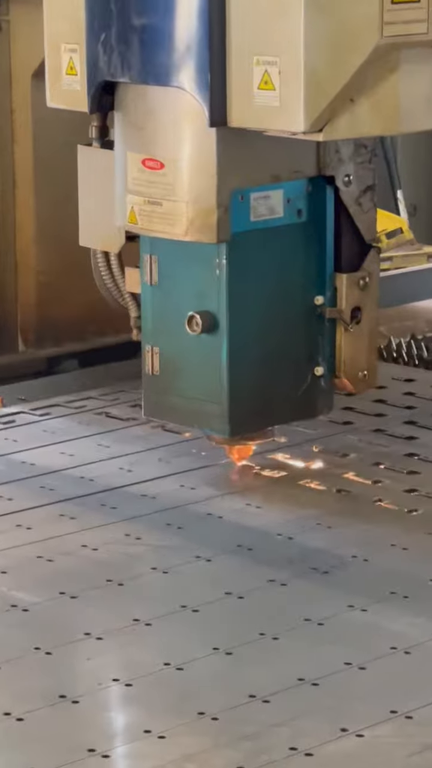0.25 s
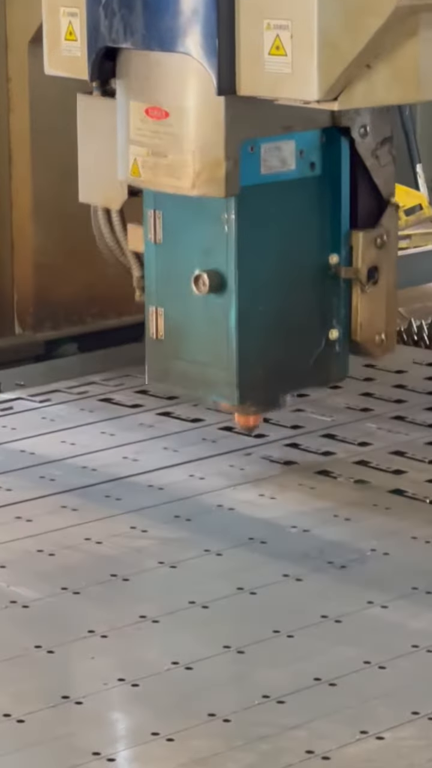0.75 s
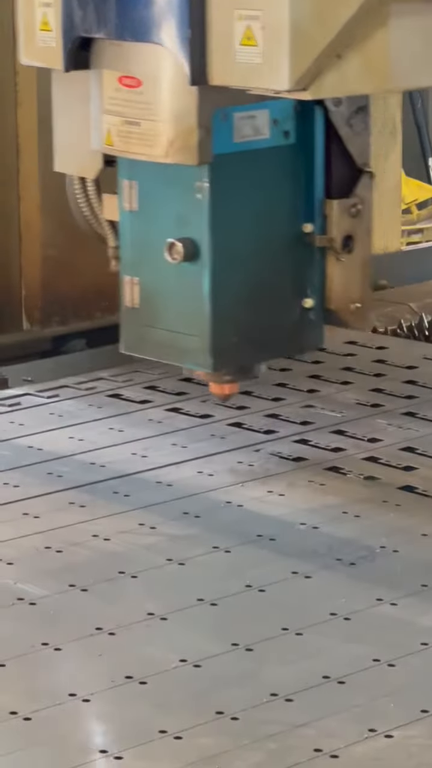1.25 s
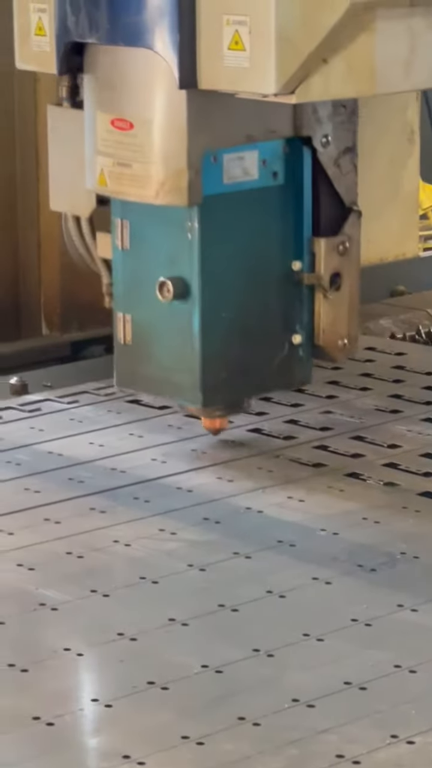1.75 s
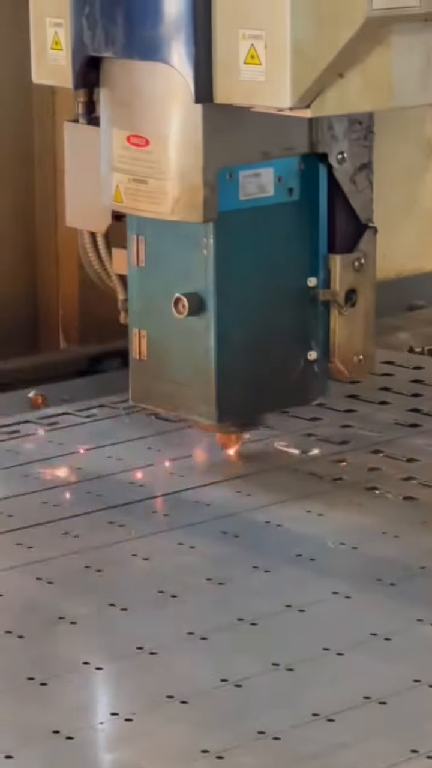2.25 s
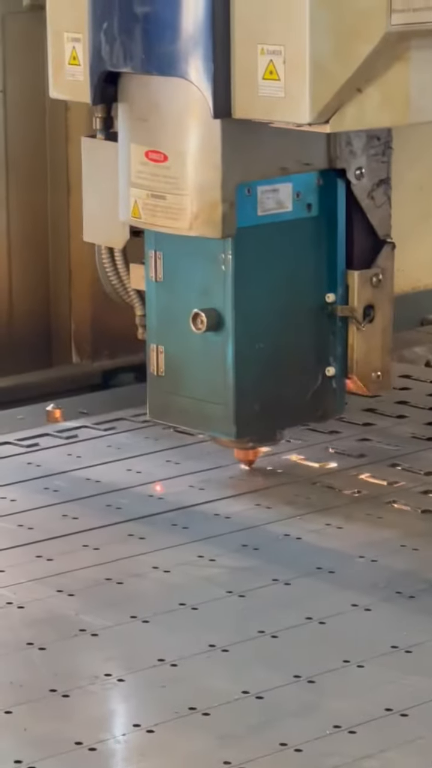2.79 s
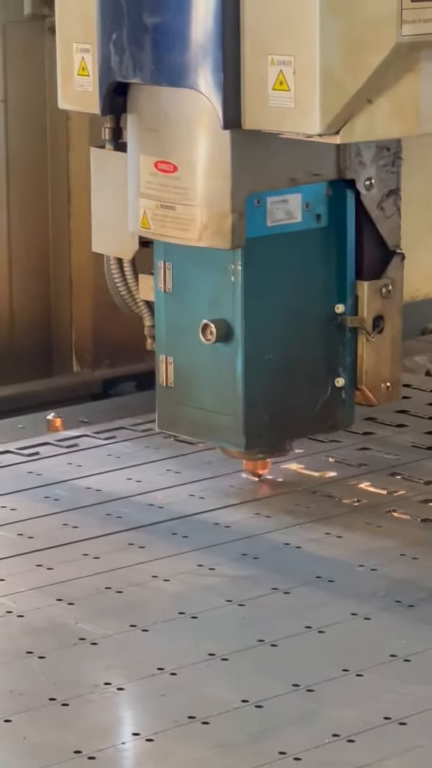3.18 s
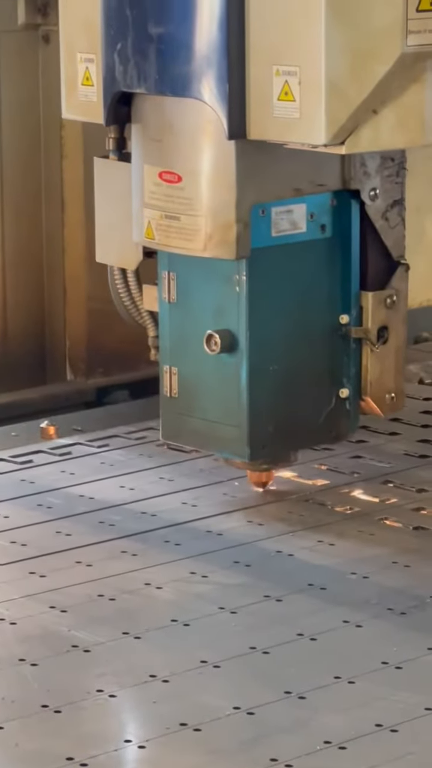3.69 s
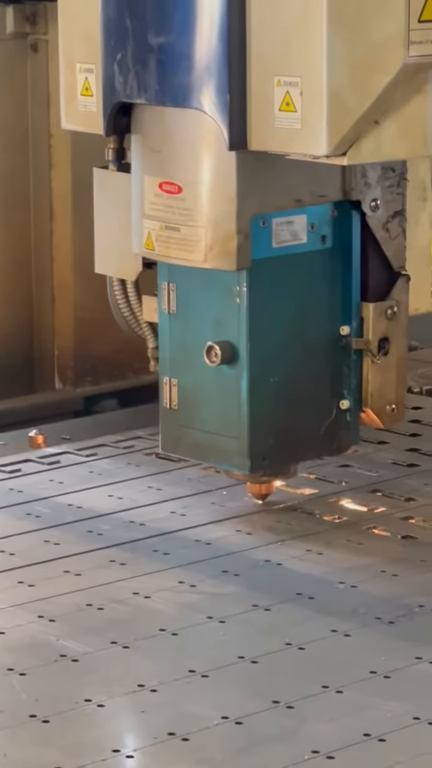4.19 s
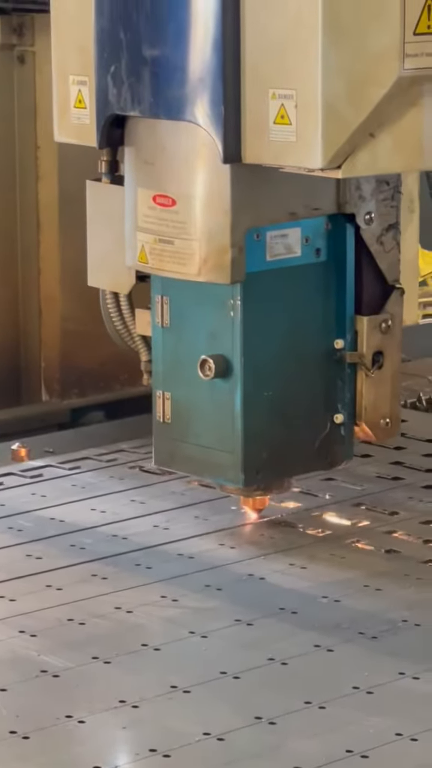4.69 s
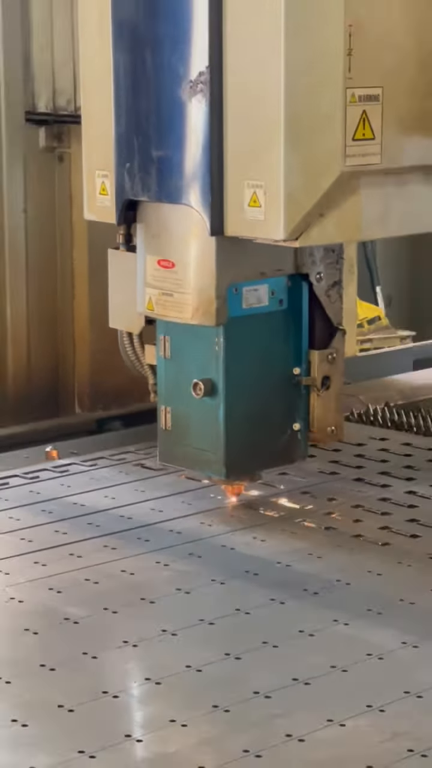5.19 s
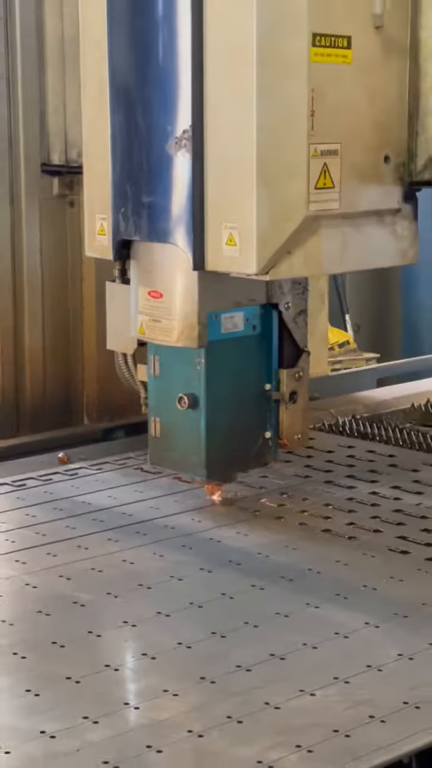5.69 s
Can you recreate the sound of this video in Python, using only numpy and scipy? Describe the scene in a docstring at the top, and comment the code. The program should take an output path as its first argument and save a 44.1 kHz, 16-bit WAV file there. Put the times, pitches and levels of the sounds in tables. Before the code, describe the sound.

Close stereo pickup of a laser cutting head in a factory hall. Broad fan roar and a wavering low hum run throughout. Thin gas hiss cuts out before one second, returns at two with sputtering crackles, then continues with faint whistles. At 3.6 seconds a loud bright air blast bursts, briefly ducking everything and ringing away in the hall.

```python
"""Fan roar, motor hum and hissing gas come first: a laser cutter at work in a factory hall.
Shaped noise makes the roar and the two-layer hiss of assist gas; wavering tones make hum and whistles.
Molten metal spits in short crackling puffs, then one air valve blast rings on through the hall.
Two close microphone ports hear it; a gain control ducks everything after bright peaks like the blast."""
import sys
import numpy as np
from scipy import signal
from scipy.fft import rfft, irfft
from scipy.io import wavfile
from scipy.ndimage import uniform_filter1d, minimum_filter1d

SR = 44100
rng = np.random.default_rng(int(sys.argv[2]) if len(sys.argv) > 2 else 0)


def convert_level_to_amplitude(level_db):
    """Map a level in decibels to its linear amplitude factor."""
    exponent = np.asarray(level_db, float) / 20
    return 10 ** exponent


def transcribe(u):
    """Save the signal u as a 16-bit wav file named by the first command-line argument.

    u: samples, shape (n,) or (channels, n), limited to [-1, 1]; the rate is SR.
    q: integer samples, one column per channel.
    """
    v = np.clip(np.atleast_2d(u).T, -1, 1)
    q = np.round(v * 32767).astype(np.int16)
    wavfile.write(sys.argv[1], SR, q)


N = 261954


def read(table, hz, column=1):
    """A column of a spectrum table, straight on a log-frequency axis."""
    table = np.transpose(table)
    return np.interp(np.log(hz + 1), np.log(table[0] + 1), table[column])


def evened(x):
    """Scales to rms 1."""
    return x / np.sqrt(np.mean(x ** 2) + 1e-20)


def curve(rows):
    """Columns of a time table, interpolated at every sample."""
    s, *columns = np.transpose(rows)
    return [np.interp(np.arange(N) / SR, s, column) for column in columns]


def stft_grid(size, length):
    """Frequencies in Hz (column) and times in s (row) of short-time spectra."""
    hz = np.fft.rfftfreq(size, 1 / SR)[:, None]
    t = np.arange(4 * length // size + 5) * size / 4 / SR
    return hz, t


# Stereo likeness and balance by pitch: pitch_hz [Hz], left_right_likeness [0-1], left_over_right_db [dB]
STEREO_IMAGE = [(100, 1, 0), (140, .997, 1), (200, .99, 1), (400, .92, 2), (600, .77, 3.4),
                (1100, .64, 2.5), (1700, .66, 2), (2100, .985, 0), (4000, .98, 0), (4900, .75, 0),
                (5200, .99, 0), (6200, .99, 0), (6800, .8, 0), (8200, .8, 0), (8900, .99, 0),
                (11600, .99, 0), (12000, .75, 0), (13300, .78, 0), (14000, .985, 0)]


def hiss(field_db, length, patchy_db):
    """Noise pair from a dB field over frequency and time, with drifting patches and stereo by pitch."""
    bins, frames = field_db.shape
    hz = np.linspace(0, SR / 2, bins)[:, None]
    a, b, c, d, patches = rng.standard_normal((frames, bins, 5)).T
    patches = uniform_filter1d(patches, size=8, axis=0)
    patches = evened(uniform_filter1d(patches, size=10, axis=1))
    likeness = np.clip(read(STEREO_IMAGE, hz), 0, 1)
    lean_db = read(STEREO_IMAGE, hz, column=2) / 2  # half the difference for each port
    left = a + 1j * b
    right = likeness * left + np.sqrt(1 - likeness ** 2) * (c + 1j * d)
    spectra = np.array([left * convert_level_to_amplitude(lean_db), right * convert_level_to_amplitude(-lean_db)])
    spectra *= convert_level_to_amplitude(field_db + patchy_db * patches)
    pair = signal.istft(spectra, nperseg=2 * bins - 2, noverlap=3 * (bins - 1) // 2)[1]
    return pair[:, :length]


def wavering_tone(hz, pole_width_hz, steady):
    """Rms-1 tone: a steady phasor (in units of the wander's rms) plus noise through two equal poles."""
    r = np.exp(-np.pi * pole_width_hz / SR)
    noise = rng.standard_normal((N, 2)) @ [1, 1j]
    wander = signal.lfilter([1], [1, -2 * r, r * r], noise)
    wander /= np.sqrt(np.mean(abs(wander) ** 2))
    carrier = np.exp(2j * np.pi * np.cumsum(hz * np.ones(N)) / SR)
    return evened(((steady + wander) * carrier).real)


# Ventilation roar of the hall, spectrum shape: pitch_hz [Hz], relative_level_db [dB per Hz]
ROAR_SPECTRUM = [(25, -26), (45, -7.5), (75, -5.5), (95, -5), (140, -4), (220, -7.5), (330, -7.5),
                 (500, -12.5), (1050, -15), (1450, -20), (2000, -21), (3300, -27.5), (5000, -34),
                 (8000, -37.5), (12000, -46), (16000, -51)]


def roar():
    """Broad noise of fans and ducts across the hall that gusts a little."""
    hz, t = stft_grid(size=4096, length=N)
    gust_db = 0.57 * evened(uniform_filter1d(rng.standard_normal(len(t)), size=5))
    return convert_level_to_amplitude(-21) * evened(hiss(read(ROAR_SPECTRUM, hz) + gust_db, N, patchy_db=.5))


# Extractor's blade tone: time_s [s], level_db [dB rms]
BLADE_LEVEL = [(0, -34), (.25, -24), (.5, -28), (.95, -25), (1.04, -19.5), (1.9, -20.5), (2.35, -23),
               (2.55, -20.5), (2.75, -23), (3.25, -19.5), (3.6, -21.5), (4.1, -29.5), (4.7, -29),
               (5.2, -26), (5.94, -33.5)]
# Second fan tone that drifts, comes and goes: time_s [s], pitch_hz [Hz], level_db [dB rms]
SECOND_FAN_TONE = [(0, 584, -40), (.4, 581.5, -35), (1.15, 580, -33), (1.7, 589, -40.5), (2.45, 586, -48),
                   (2.65, 586, -34), (3.4, 584, -31.5), (3.9, 583.5, -38.5), (4.6, 584, -45),
                   (5.1, 583, -38), (5.5, 584, -32), (5.94, 581, -35.5)]
# Overtones of the blade tone: multiple [1], level_db [dB rms at full blade level], pole_width_hz [Hz]
BLADE_OVERTONES = [(2, -36, 3.1), (3, -35, 4.7)]
# Weaker machine tones: pitch_hz [Hz], level_db [dB rms], pole_width_hz [Hz]
MACHINE_TONES = [(63.9, -36, 0.95), (91.95, -35.5, 6.9), (292.6, -39, 3.1), (958.5, -43, 1.76),
                 (1010, -48, 4.3), (1683, -49, 2), (2037, -50, 2.2), (2397, -50.5, 2.3)]


def hum():
    """Drone, blade tone and weaker tones; standing waves make them a little louder on the left."""
    t = np.arange(N) / SR
    drone_hz, blade_hz = 58.14, 171.35
    # two motors a little apart in speed beat slowly: period 3.55 s, loudest at 3.7 s
    beat = abs(1 + 0.63 * np.exp(2j * np.pi * (t - 3.7) / 3.55))
    drone_gain = convert_level_to_amplitude(-31 + .8 * t) * beat  # also grows by .8 dB per s
    fan_hz, fan_db = curve(SECOND_FAN_TONE)
    blade_db = curve(BLADE_LEVEL)[0]
    tones = [(drone_hz, drone_gain * wavering_tone(drone_hz, 3, steady=8.0)),
             (blade_hz, convert_level_to_amplitude(blade_db) * wavering_tone(blade_hz, 8.1, steady=3.8)),
             (fan_hz.mean(), convert_level_to_amplitude(fan_db) * wavering_tone(fan_hz, 6, steady=1.75))]
    follow_db = 0.35 * (blade_db - blade_db.max())  # overtones share part of the level changes
    for multiple, level_db, width_hz in BLADE_OVERTONES:
        hz = multiple * blade_hz
        tones.append((hz, convert_level_to_amplitude(level_db + follow_db) * wavering_tone(hz, width_hz, steady=0.96)))
    for hz, level_db, width_hz in MACHINE_TONES:
        tones.append((hz, convert_level_to_amplitude(level_db) * wavering_tone(hz, width_hz, steady=0.64)))
    sides = np.c_[[.5, -.5]]
    return sum(tone * convert_level_to_amplitude(read(STEREO_IMAGE, hz, column=2) * sides) for hz, tone in tones)


# Thin top of the jet, spectrum shape: pitch_hz [Hz], relative_level_db [dB per Hz]
JET_TOP_SPECTRUM = [(6000, -33), (9000, 4.5), (12000, -4.5), (16000, -8)]
# Body of the jet, spectrum shape: pitch_hz [Hz], relative_level_db [dB per Hz]
JET_BODY_SPECTRUM = [(2000, -26.5), (4000, 0), (6500, 0.5), (8000, 1), (10000, 2), (12000, -5),
                     (14000, -19)]
# Assist gas flowing: start_s [s], end_s [s], top_level_db [dB rms at start], body_level_db [dB rms at start]
GAS_FLOWS = [(-.1, 0.37, -42.5, -38), (.39, 0.71, -42, -55), (.62, 0.77, -40, -38.5),
             (1.66, 1.69, -42, -49), (1.975, 2.25, -35.5, -35.5), (2.28, 6.1, -40.5, -36)]


def gas():
    """Turbulent jet in two layers, flickering together as melt is blown from the kerf."""
    t = np.arange(N) / SR
    open_s, close_s = 0.019, .06
    top_sag_db_per_s, body_sag_db_per_s = 0.1, 1.2  # a long flow slowly weakens
    top_power, body_power = convert_level_to_amplitude(-56) ** 2, convert_level_to_amplitude(-47) ** 2  # the leak between the flows
    for start, end, top_db, body_db in GAS_FLOWS:
        gate = np.clip(np.minimum((t - start) / open_s, 1 + (end - t) / close_s), 0, 1)
        top_power = top_power + (gate * convert_level_to_amplitude(top_db - top_sag_db_per_s * (t - start))) ** 2
        body_power = body_power + (gate * convert_level_to_amplitude(body_db - body_sag_db_per_s * (t - start))) ** 2
    hz, frame_s = stft_grid(size=512, length=N)
    # quick and slow flicker
    flicker_db = 1.0 * evened(uniform_filter1d(rng.standard_normal(len(frame_s)), size=6))
    flicker_db += 0.8 * evened(uniform_filter1d(rng.standard_normal(len(frame_s)), size=30))
    top = evened(hiss(read(JET_TOP_SPECTRUM, hz) + flicker_db, N, patchy_db=1.5))
    body = evened(hiss(read(JET_BODY_SPECTRUM, hz) + 0.56 * flicker_db, N, patchy_db=3.0))
    return np.sqrt(top_power) * top + np.sqrt(body_power) * body


# The jet whistles across the kerf:
# start_s [s], end_s [s], pitch_hz [Hz], pole_width_hz [Hz], level_db [dB rms before the fades]
KERF_WHISTLES = [(2.62, 2.8, 5290, 80, -46), (2.69, 3.24, 6390, 90, -47), (2.66, 3.46, 5980, 900, -41.5),
                 (3.22, 3.45, 5950, 110, -47), (4.0, 4.5, 6450, 400, -45)]


def whistles():
    """Fuzzy edge tones of the jet that fade in and out."""
    t = np.arange(N) / SR
    out = 0
    for start, end, hz, width_hz, level_db in KERF_WHISTLES:
        fade = np.clip(np.minimum(t - start, end - t) / .05, 0, 1)
        out = out + convert_level_to_amplitude(level_db) * wavering_tone(hz, width_hz, steady=0) * fade
    return out


# Spits of molten metal: start_s [s], level_db [dB rms at the start, before snap and crackle], t60_s [s]
METAL_SPITS = [(.372, -33, .07), (.468, -37, .06), (.635, -39, .25), (1.977, -33, .09), (1.996, -34, .15),
               (2.011, -29, .2), (2.072, -34, .17), (2.175, -44, .2), (2.24, -40, .08), (3.52, -37, .05)]


def spits():
    """Each spit of molten metal is a sudden bright puff made of uneven crackles."""
    out, length = np.zeros((2, N)), SR // 4
    hz, t = stft_grid(size=128, length=length)
    after = np.arange(length) / SR
    # the first instant is sharpest
    snap = np.minimum(after / .0005, 1) * (1 + 0.54 * np.exp(-after / 0.0021))
    # eight small ones scattered along the cut, from 2.3 s on
    first_s = 2.3
    small = [(first_s + when * (N / SR - first_s), -42 + 6 * size, .06)
             for when, size in rng.random((8, 2))]
    # falls 24 dB per octave below 9 kHz
    field_db = -24 * np.maximum(np.log2(9000 / (hz + 1)), 0) + 0 * t
    for start, level_db, t60 in METAL_SPITS + small:
        puff = evened(hiss(field_db, length, patchy_db=6))
        crackle = convert_level_to_amplitude(1.6 * evened(uniform_filter1d(rng.standard_normal(length), size=60)))
        spit = convert_level_to_amplitude(level_db - 60 * after / t60) * snap * crackle * puff
        at = round(start * SR)
        part = out[:, at:at + length]
        part += spit[:, :part.shape[1]]
    return out


# Air blast, spectrum shape and hall: pitch_hz [Hz], relative_level_db [dB per Hz], hall_t60_s [s]
BLAST_SPECTRUM = [(500, -22, .3), (2000, -5.5, 1), (3530, -3.5, 1.2), (4300, -5, 1.2), (5030, -3, 0.9),
                  (8000, 2.5, 0.63), (10000, 0.5, .65), (12500, -2, .5), (14500, -2, .4), (16000, -9, 0.33)]
# Peaks and notches in the blast's hiss: pitch_hz [Hz], width_hz [Hz], gain_db [dB, negative cuts]
BLAST_PEAKS = [(4150, 380, 5.5), (5340, 160, 7), (5620, 150, 6), (6640, 120, 5), (8100, 340, 4.5),
               (8395, 150, -2), (10200, 280, -16)]


def blast():
    """A valve dumps air for a moment; the hall then lets each band die at its own speed."""
    start_s, open_s, level_db = 3.592, 0.043, -14.5
    length, out = 3 * SR // 2, np.zeros((2, N))
    hz, t = stft_grid(size=512, length=length)
    peaks_db = sum(db / (1 + (2 * (hz - f) / width) ** 2) for f, width, db in BLAST_PEAKS)
    tail_db = -60 * np.maximum(t - open_s, 0) / read(BLAST_SPECTRUM, hz, column=2)
    # hiss around 4860 Hz grows by 5 dB in .05 s while the valve opens fully; far pitches shrink
    bloom_shape = np.clip(1 - 0.55 * np.log2((hz + 1) / 4860) ** 2, -1, 1)
    bloom_db = 5 * np.clip(t / .05, 0, 1) * bloom_shape
    air = hiss(read(BLAST_SPECTRUM, hz) + peaks_db + tail_db + bloom_db, length, patchy_db=1.2)
    air /= np.sqrt(np.mean(air[:, :SR // 50] ** 2))  # rms 1 over the first 20 ms
    onset = np.minimum(np.arange(length) / SR / 0.0021, 1)
    at = round(start_s * SR)
    out[:, at:at + length] = convert_level_to_amplitude(level_db) * air * onset
    return out


def scene():
    """All sources at the microphone ports."""
    return roar() + hum() + gas() + whistles() + spits() + blast()


# Phase between the ports: pitch_hz [Hz], left_lead_rad [radians]
PORT_LEAD = [(0, 0), (1500, -.15), (2000, 0), (4100, .1), (4700, 1.2), (4950, 2.4), (5100, 0), (6150, .08),
             (6450, .9), (8100, 2.4), (8800, 3.0), (11600, 3.28), (12100, 4.1), (13400, 5.3), (14100, 6.15),
             (16000, 6.28)]


def ports(dry):
    """Spectrum behind the ports: a cavity resonance, a phase lead between them and a top edge."""
    hz = np.fft.rfftfreq(N, 1 / SR)
    resonance_hz, width_hz, boost_db, edge_hz = 14760, 2300, 10, 15850
    colour = convert_level_to_amplitude(boost_db / (1 + (2 * (hz - resonance_hz) / width_hz) ** 2)) * (hz < edge_hz)
    lead = np.interp(hz, *np.transpose(PORT_LEAD))
    return rfft(dry) * colour * np.exp(1j * lead * np.c_[[.5, -.5]])


def gain_control_db(bright):
    """Duck in dB that bright peaks trigger: it holds, then part lets go at once and part creeps back."""
    level_db = 10 * np.log10(uniform_filter1d((bright ** 2).mean(0), size=1100) + 1e-12)
    over = np.clip((level_db + 21) / 2, 0, 1)  # starts at -21 dB, full 2 dB higher
    cut_db = 6.55 * over
    hold = round(.16 * SR)
    held_db = -minimum_filter1d(-cut_db, hold, origin=(hold - 1) // 2)  # highest cut of the last .16 s
    r = np.exp(-1 / (.3 * SR))
    creep_db = signal.lfilter([1 - r], [1, -r], held_db)
    smooth_db = uniform_filter1d(np.maximum(held_db, 0.66 * creep_db), size=900)
    return np.roll(smooth_db, round(0.029 * SR))  # shifted 29 ms later


def top_cut(x):
    """Nothing passes above the cut-off."""
    return signal.sosfilt(signal.butter(12, 17000, fs=SR, output="sos"), x)


def record(dry):
    """Two close microphone ports, then a gain control that listens to the treble and ducks everything."""
    hz = np.fft.rfftfreq(N, 1 / SR)
    spectrum = ports(dry)
    low = irfft(spectrum / (1 + (hz / 3500) ** 4), N)
    bright = irfft(spectrum, N) - low
    mix = (bright + low) * convert_level_to_amplitude(-gain_control_db(bright))
    return top_cut(mix)


dry = scene()
out = record(dry)
transcribe(out)
```